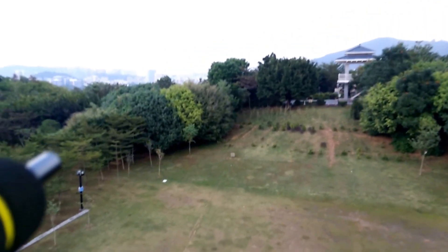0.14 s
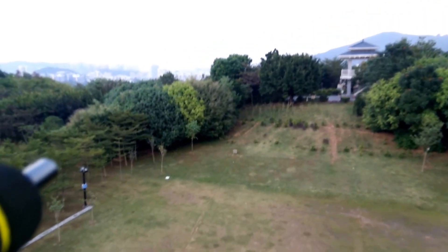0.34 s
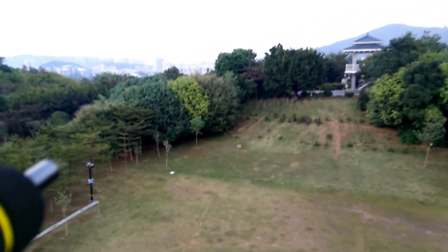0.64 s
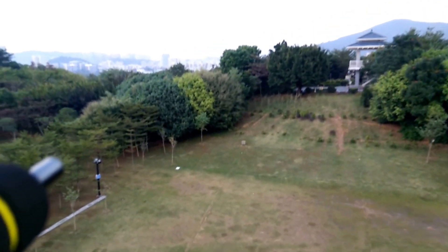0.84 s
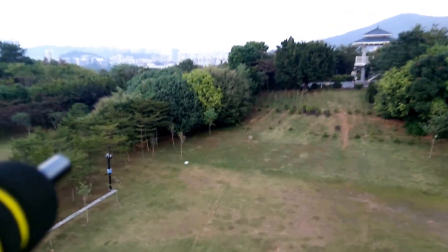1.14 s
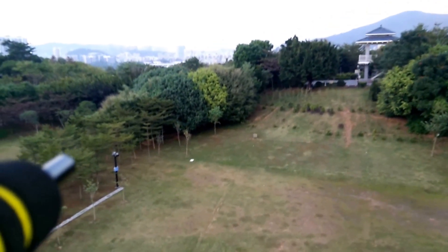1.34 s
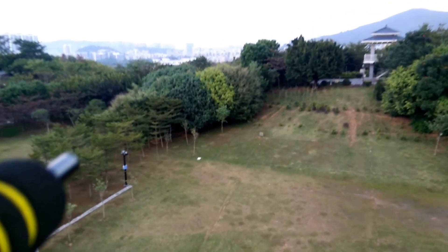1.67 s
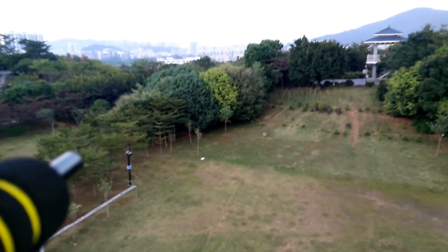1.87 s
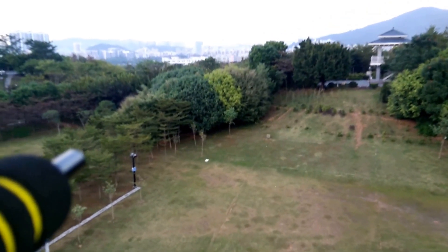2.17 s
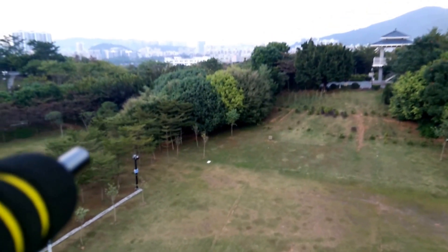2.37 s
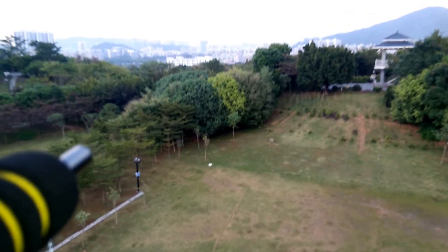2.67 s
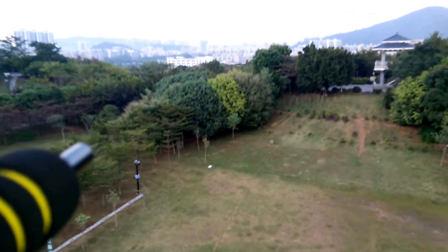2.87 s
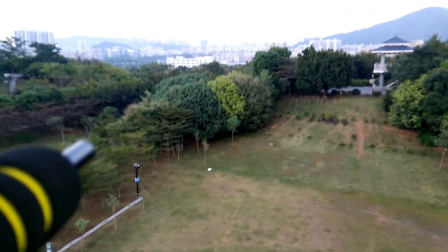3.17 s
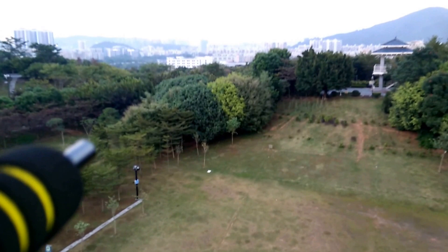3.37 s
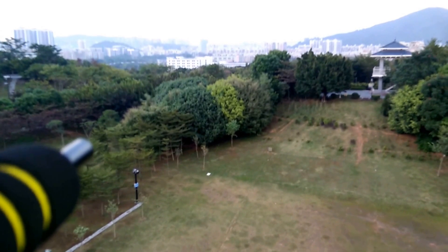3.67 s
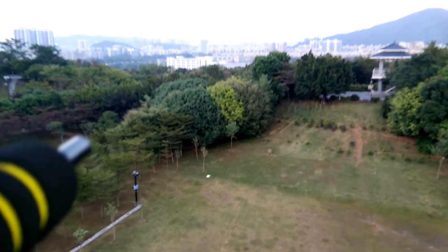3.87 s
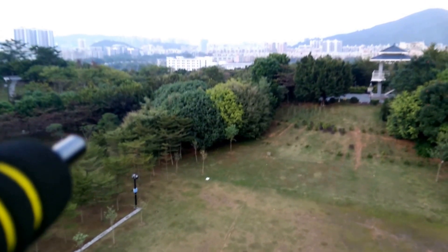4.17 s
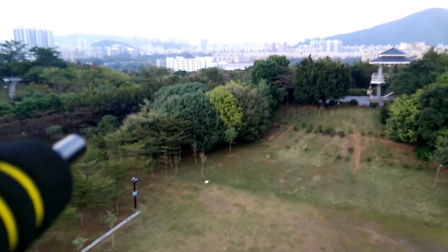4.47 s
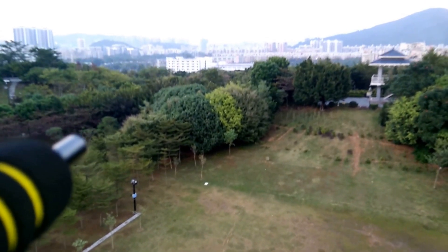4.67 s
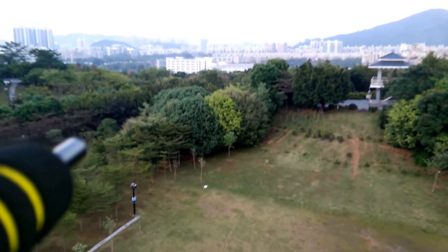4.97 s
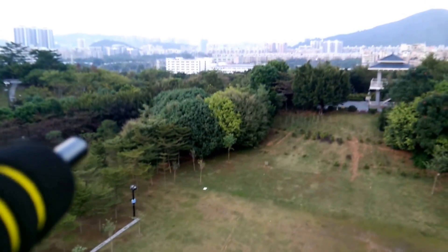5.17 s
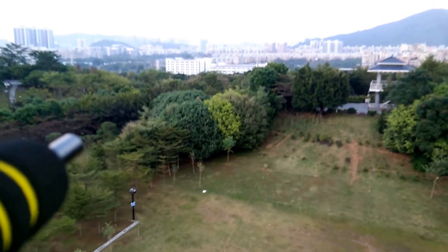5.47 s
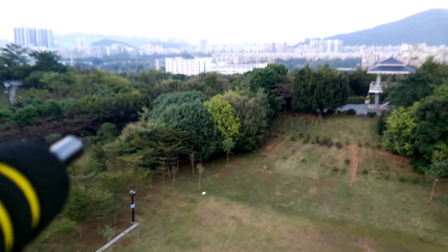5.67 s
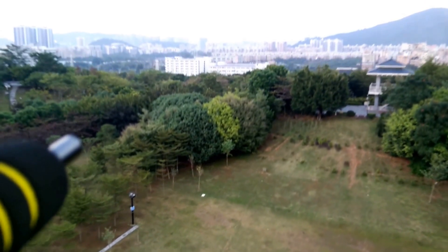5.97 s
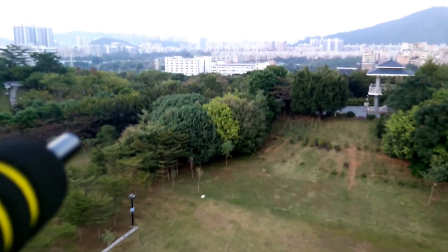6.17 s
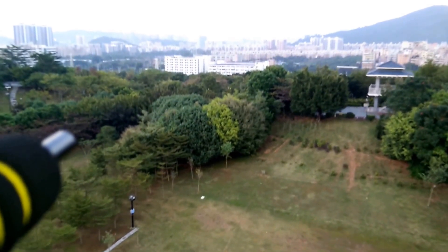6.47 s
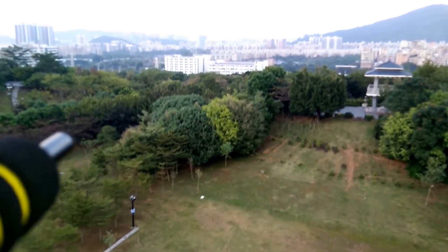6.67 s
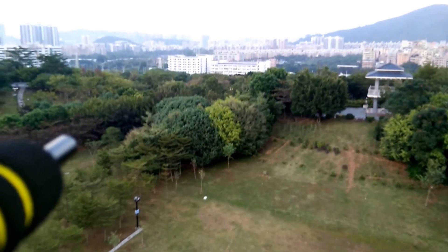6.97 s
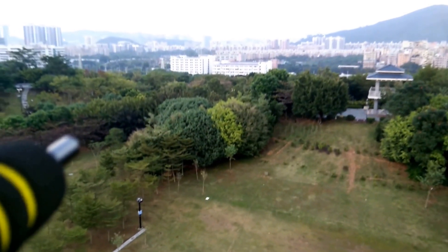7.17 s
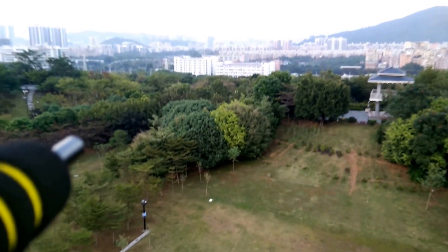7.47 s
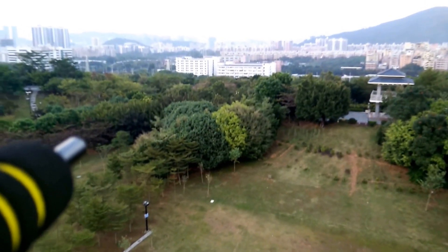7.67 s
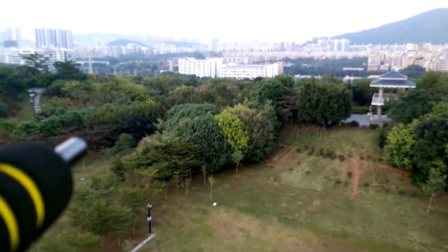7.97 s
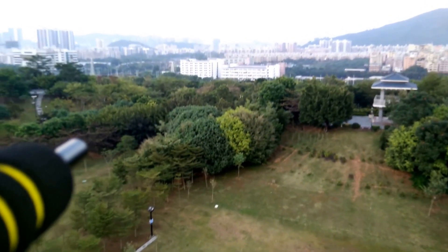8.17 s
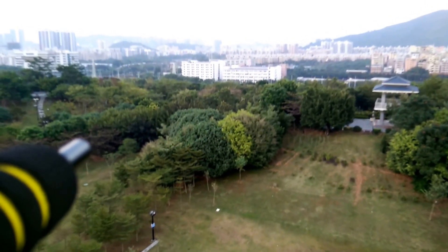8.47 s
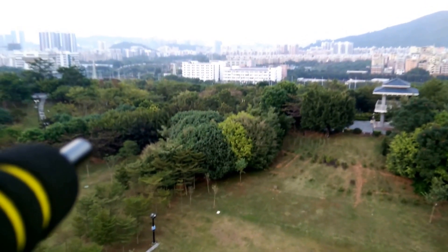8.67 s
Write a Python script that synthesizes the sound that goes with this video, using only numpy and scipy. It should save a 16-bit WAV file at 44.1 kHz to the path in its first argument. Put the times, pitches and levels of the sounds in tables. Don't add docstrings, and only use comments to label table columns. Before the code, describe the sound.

The whole stretch, nearly 9 seconds, is steady multirotor flight heard from under the craft as it hovers over a lawn and trees. Four propellers make a low hum around 165 to 190 hertz, slightly detuned so it throbs and beats, with only tiny pitch drifts. Above it lie rough blade slaps, a dull drumming on the shell, a dense bright hiss strongest around 5 to 8 kilohertz, and thin, nearly fixed whistles around 7 to 8 kilohertz. From 0 to about 2 seconds, downwash buffets the microphones hard, with low thumps, flutter and overloaded pops jumping between left and right. From 2 to 4 seconds the bursts thin out. Afterwards hum, hiss and whine dominate over softer rumble, with isolated faint pops near 6.3, 6.9, 7.2 and 8.6 seconds. It stays close, dry and wide, and the motors never stop.

```python
import sys
import numpy as np
from scipy import signal
from scipy.fft import rfft, irfft, next_fast_len
from scipy.io import wavfile
from scipy.ndimage import map_coordinates

SR = 44100
rng = np.random.default_rng(int(sys.argv[2]) if len(sys.argv) > 2 else 0)


def int16_out(signal):
    q = np.round(np.clip(np.atleast_2d(signal).T, -1, 1) * 32767)
    wavfile.write(sys.argv[1], SR, q.astype(np.int16))


def to_linear_factor(level_db):
    exponent = np.asarray(level_db, float) / 20
    return 10 ** exponent


N = 388962

# start angle [turns], blade tone left [dB], right [dB], its left lead [rad].
ROTORS = [(.089, -24.7, -30, -1.59), (.123, -28.3, -23.3, 1.59), (.16, -15.8, -22.4, -1.02),
          (.281, -25.5, -20.2, 1.46)]


def unit(x):
    return x / np.sqrt(np.mean(x ** 2, -1, keepdims=True) + 1e-20)


def curves(rows):
    time_s, *columns = np.transpose(rows)
    return np.array([np.interp(np.arange(N) / SR, time_s, column) for column in columns])


def wobble(knots_per_s, count):
    knots = rng.standard_normal((count, 1000))
    coarse_at = np.arange(0, N + 64, 64)
    coarse = [map_coordinates(k, [coarse_at * knots_per_s / SR]) for k in knots]
    return np.array([np.interp(np.arange(N), coarse_at, c) for c in coarse])


def noise(colour, alike=0, lead_ms=0):
    m = next_fast_len(N + 8192)
    hz = np.fft.rfftfreq(m, 1 / SR)
    colour_hz, colour_db = np.transpose(colour)
    gain = to_linear_factor(np.interp(np.log(hz + 1), np.log(colour_hz + 1), colour_db, -120, -120))
    shared, left, right = rfft(rng.standard_normal((3, m)))
    share = np.clip(alike, 0, 1)
    early = np.exp(2j * np.pi * hz * lead_ms / 1000)
    common = np.sqrt(share) * shared * [early, np.ones_like(early)]
    own = np.sqrt(1 - share) * np.array([left, right])
    return unit(irfft((common + own) * gain, m)[:, :N])


def tone(angle, left_db, right_db, lead_rad):
    turn = (angle - 2 * np.pi * np.floor(angle / (2 * np.pi))).astype(np.float32)
    pair = np.array([np.sin(turn + np.float32(lead_rad)), np.sin(turn)])
    return np.sqrt(2) * to_linear_factor([[left_db], [right_db]]) * pair


def shafts():
    # time [s], speed of motors 0 to 3 [Hz].
    speed = [(0.0, 84.9, 83.83, 91.88, 93.45), (0.72, 85.95, 82.93, 91.93, 93.83),
             (1.08, 85.41, 83.66, 91.81, 92.61), (1.46, 86.06, 83.65, 91.78, 92.99),
             (1.94, 85.85, 83.86, 91.17, 91.91), (2.77, 86.43, 84.65, 91.31, 91.29),
             (3.25, 87.05, 84.07, 90.59, 91.41), (3.79, 87.01, 84.32, 90.6, 91.33),
             (3.97, 86.8, 83.91, 90.13, 90.73), (4.27, 86.92, 84.74, 90.45, 90.7),
             (5.57, 87.58, 84.19, 90.75, 90.89), (5.73, 87.1, 84.1, 90.89, 90.36),
             (5.99, 87.53, 84.34, 91.0, 90.65), (6.66, 87.31, 84.04, 90.5, 90.04),
             (7.28, 87.44, 84.06, 91.07, 90.29), (7.58, 87.6, 84.51, 91.05, 89.93),
             (8.16, 87.59, 83.9, 90.36, 89.89), (8.82, 87.52, 84.69, 91.04, 89.04)]
    start_turns = np.array(ROTORS)[:, :1]
    turns = start_turns + np.cumsum(curves(speed), 1) / SR
    return 2 * np.pi * turns + 0.06 * wobble(11, count=4)


def drumming(angle):
    # frequency [Hz], level [dB per Hz].
    body = [(150, -18), (230, -5), (300, -1.5), (450, -5.5), (590, -0.5), (650, -21)]
    # order of the mean shaft speed, level [dB].
    beats = [(3, -30), (4.04, -39), (5, -38), (6.1, -37)]
    wash = to_linear_factor(-36 + 1.5 * wobble(20, count=1)) * noise(body, alike=0.7, lead_ms=0.2)
    smear_rad = 1.1 * wobble(22, count=len(beats))
    sway = to_linear_factor(2.5 * wobble(9, count=len(beats)))
    mean = angle[1:].mean(0)
    out = wash
    for (order, db), smear, gain in zip(beats, smear_rad, sway):
        out = out + gain * tone(order * mean + smear, db, db, lead_rad=0.58)
    return out


def hiss(angle):
    # frequency [Hz], level [dB per Hz].
    swish_colour = [(600, -19.5), (1000, -21), (2000, -16.5), (3000, -12), (3700, -8.5), (4400, -10),
                    (4900, -11), (5150, -10), (5450, -8)]
    frame_colour = [(5300, -13), (5580, -1.5), (5800, -4.5), (6500, 0), (7000, 1), (7400, 1.5), (7900, -3),
                    (8500, -5.5), (8750, -8.5), (9200, -11.5), (9450, -11.5), (9800, -27.5)]
    air_colour = [(9300, -25), (9500, -2), (9900, 0), (12000, -1), (16500, 0)]
    passing = 1 + 0.13 * np.cos(2 * angle[2]) + 0.36 * np.cos(4 * angle[2])
    swish = to_linear_factor(-23) * passing * noise(swish_colour, alike=0.22, lead_ms=0.21)
    frame_db = -12.5 + 0.65 * wobble(4.5, count=2)
    frame = to_linear_factor(frame_db) * noise(frame_colour, alike=0.33, lead_ms=0.2063)
    gusts_db = 0.4 * wobble(6, count=1) + 0.5 * wobble(25, count=1)
    air = to_linear_factor([[-23], [-21.2]] + gusts_db) * noise(air_colour, alike=0.15)
    return swish + frame + air


def eddies(strength_db):
    # time [s], port [0 left, 1 right], level [dB], sharpness [dB].
    pops = [(.095, 1, 15.5, -8), (.127, 1, 0, -7), (.263, 1, -3, 7), (.456, 0, -10, 8), (.526, 1, 5, 15),
            (.631, 0, 5, -17), (.648, 0, -3, 6), (.685, 1, 13, 0), (.893, 0, 0, 6), (.907, 1, 4, -4),
            (1.086, 1, 4, 3), (1.184, 0, 0, 10), (1.205, 0, 13, -15), (1.241, 0, 12, -11),
            (1.392, 1, 12, 1), (1.518, 1, 8, -5.5), (1.79, 0, 7.5, -17), (1.907, 1, 2, -10),
            (1.983, 1, 8, -4), (2.363, 1, 6, -13.5), (2.384, 1, 0, -3), (2.71, 0, 10.5, -21.5),
            (3.256, 1, 6.5, -6.5), (3.598, 0, 0, -12), (3.746, 1, 5, -18.5), (3.876, 0, 6, -10),
            (6.349, 0, 3, -18), (6.873, 1, -8, 3), (7.185, 1, -4, -5), (8.588, 0, 2, -15)]
    small_count = 60
    crowd = np.cumsum(to_linear_factor(1.5 * strength_db))
    when, small_port = rng.random((small_count, 2)).T
    size, sharp = rng.standard_normal((small_count, 2)).T
    small_s = np.searchsorted(crowd, when * crowd[-1]) / SR
    small_db = -5.5 - 0.5 * size
    small_sharp_db = -8.5 + 4.5 * sharp
    every = [*pops, *np.transpose([small_s, small_port, small_db, small_sharp_db])]

    out = np.zeros((2, N + 1000))
    t = np.arange(-500, 500) / SR
    for (time_s, port, db, sharp_db), turn in zip(every, rng.random((len(every), 1))):
        hz = 330 * to_linear_factor(0.5 * (sharp_db + 11.5))
        burst = np.exp(-0.5 * (t * hz / 0.3) ** 2) * np.cos(2 * np.pi * (hz * t + turn))
        out[round(port), round(time_s * SR):][:len(t)] += to_linear_factor(db - 1.5) * burst
    return out[:, 500:N + 500]


def downwash():
    # time [s], strength [dB], lean to the left port [dB].
    wind = [(0, -16.5, -11.5), (.25, -13, -0.5), (.75, -12.5, 0.5), (1, -17, 3.5), (1.4, -16.5, -3.5),
            (2.2, -18.5, -1.5), (2.45, -23, -8), (3, -25, 1), (3.3, -23, -5), (3.85, -22, 1),
            (4.2, -25, -3), (4.8, -27, -3), (5.3, -25.5, 1.5), (6, -24, -3), (6.9, -24.5, -2.5),
            (7.6, -24, -4), (8.1, -29, -1), (8.82, -27, -1)]
    # frequency [Hz], level [dB per Hz].
    rumble_colour = [(20, -14), (35, -25), (55, 1), (90, -2), (150, -3), (260, -12.5), (400, -36)]
    flutter_colour = [(100, -35), (200, 0), (330, -2.5), (500, -8.5), (800, -16), (1500, -21),
                      (3000, -20.5), (5000, -20.5)]
    flutter_growth = 1.79
    strength_db, lean_db = curves(wind)
    ports_db = strength_db + np.array([lean_db, -lean_db]) / 2
    loudest_db = strength_db.max()
    gusts = wobble(7, count=4)
    rumble_db = ports_db + 4 + 2 * gusts[:2]
    flutter_db = loudest_db + flutter_growth * (ports_db - loudest_db) + 1.5 + 2 * gusts[2:]
    lumps = to_linear_factor(2.73 * wobble(14, count=2))
    rumble = to_linear_factor(rumble_db) * unit(lumps * noise(rumble_colour))
    flicker = to_linear_factor(2.62 * wobble(45, count=2))
    flutter = to_linear_factor(flutter_db) * unit(flicker * noise(flutter_colour, alike=0.18))
    return rumble + flutter + eddies(strength_db)


def slaps(angle):
    # left [dB], right [dB], left lead [ms].
    slap_levels = [
        (-46, -50, .22),
        (-55, -55, .2),
        (-43.5, -43.5, .22),
    ]
    skirt = 1.017 * angle[2] + 0.37 * wobble(40, count=1)[0]
    out = np.zeros((2, N))
    for a, (left_db, right_db, lead_ms) in zip([*angle[2:], skirt], slap_levels):
        order_lead_rad = 2 * np.pi * 88 * lead_ms / 1000
        comb = np.zeros((2, N))
        for order in range(8, 24, 2):
            fade_db = -0.02 * (order - 13) ** 2
            comb += tone(order * a, left_db + fade_db, right_db + fade_db, order * order_lead_rad)
        out += to_linear_factor(3 * wobble(30, count=1)) * comb
    return out


def whistles(angle):
    # time [s], rate of controllers 0 to 3 [Hz].
    chop_rates = [(0.0, 7159.4, 7381.8, 7624.6, 8188.7), (3.0, 7158.3, 7381.1, 7623.6, 8187.1),
                  (6.0, 7157.7, 7379.3, 7622.2, 8185.8), (8.8, 7156.5, 7378.0, 7621.2, 8184.4)]
    # motor, order, left [dB], right [dB], left lead [rad].
    whine = [(0, -15, -37.4, -41.6, -0.3), (0, -14, -25.1, -28.0, -0.1), (0, -1, -34.4, -32.3, 1.8),
             (0, 0, -17.8, -18.6, 2.8), (0, 1, -35.8, -38.6, -3.0), (0, 14, -29.0, -40.2, 1.5),
             (1, -14, -31.6, -25.1, -2.0), (1, -1, -35.6, -31.5, 2.3), (1, 0, -17.4, -15.0, 2.3),
             (1, 1, -36.2, -31.8, 1.9), (1, 14, -41.2, -32.9, -2.2), (2, -14, -24.5, -31.5, 0.5),
             (2, 0, -35.4, -23.5, 1.7), (2, 14, -42.1, -44.4, -3.1), (3, -28, -37.6, -30.7, 1.0),
             (3, -14, -36.6, -34.8, -3.1), (3, 0, -33.9, -29.4, -1.2), (3, 14, -41.5, -35.5, 2.6)]
    # left [dB], right [dB].
    cogging = [(-46, -51), (-50, -44), (-49, -44), (-49, -39)]
    chop = 2 * np.pi * np.cumsum(curves(chop_rates), 1) / SR
    sway = to_linear_factor(2 * wobble(12, count=4))
    out = np.zeros((2, N))
    for motor, order, left_db, right_db, lead_rad in whine:
        m = round(motor)
        out += sway[m] * tone(chop[m] + round(order) * angle[m], left_db, right_db, lead_rad)
    for a, (left_db, right_db) in zip(angle, cogging):
        out += tone(42 * a, left_db, right_db, lead_rad=1)
    return out


def hum(angle):
    # order, level for propellers 0 to 3 [dB].
    low_orders = [(1, -38, -30, -36, -33), (3, -42, -40, -44, -38), (4, -44, -50, -52, -50),
                  (5, -47, -53, -49, -40), (6, -46, -55, -46, -40)]
    out, shake = np.zeros((2, N)), np.zeros((2, N))
    for m, (a, (_, left_db, right_db, lead_rad)) in enumerate(zip(angle, ROTORS)):
        out += to_linear_factor(wobble(7.7, count=1)) * tone(2 * a, left_db, right_db, lead_rad)
        sway = to_linear_factor(1.6 * wobble(12, count=len(low_orders)))
        pan_db = (left_db - right_db) / 4
        for gain, (order, *db) in zip(sway, low_orders):
            phase = order * a + 6 * rng.random()
            line = gain * tone(phase, db[m] + pan_db, db[m] - pan_db, rng.normal(0, 0.8))
            out += line
            if order == 1:
                shake += line
    pressure = out + 4.0 * shake
    bent = 0.44 * pressure ** 2 + 0.68 * pressure ** 3
    low_cut = signal.butter(4, 170, "high", fs=SR, output="sos")
    return out + signal.sosfilt(low_cut, bent)


def scene():
    angle = shafts()
    return drumming(angle) + hiss(angle) + downwash() + slaps(angle) + whistles(angle) + hum(angle)


def low_pass(x):
    return signal.sosfilt(signal.butter(12, 15730, fs=SR, output="sos"), x)


def record(dry):
    top = 0.96
    flat = dry / (1 + np.abs(dry / top) ** 10) ** (1 / 10)
    return low_pass(flat)


dry = scene()
out = record(dry)
int16_out(out)
```